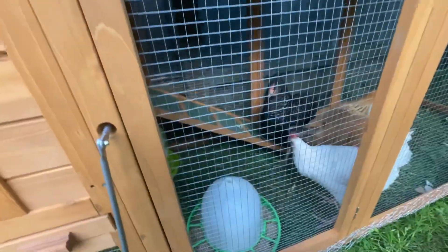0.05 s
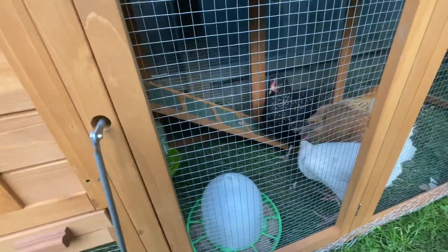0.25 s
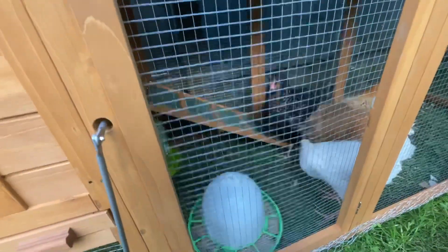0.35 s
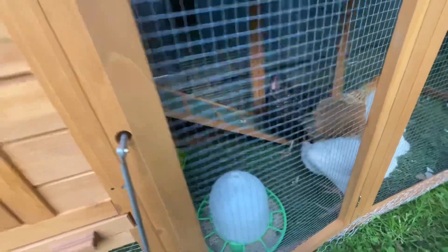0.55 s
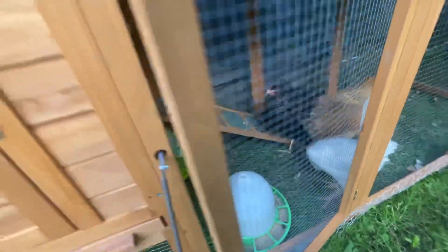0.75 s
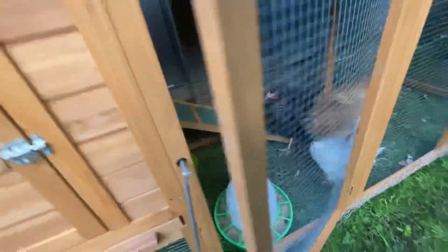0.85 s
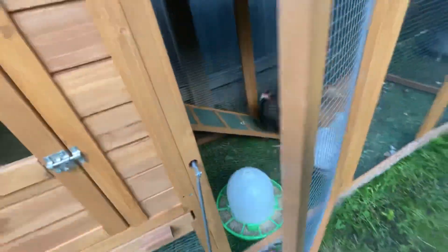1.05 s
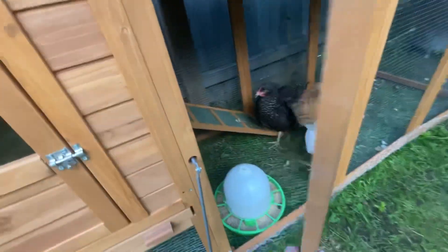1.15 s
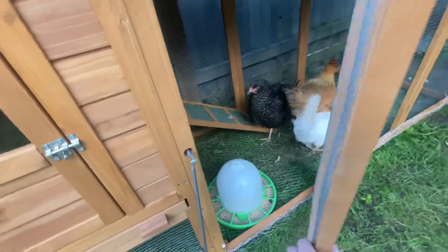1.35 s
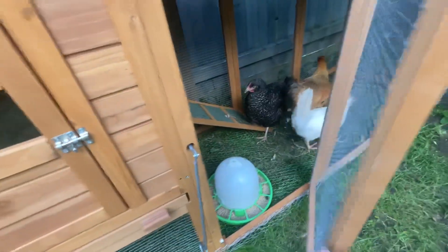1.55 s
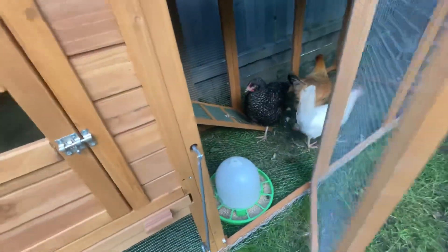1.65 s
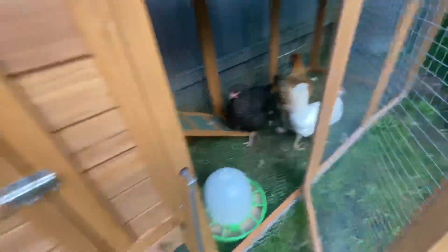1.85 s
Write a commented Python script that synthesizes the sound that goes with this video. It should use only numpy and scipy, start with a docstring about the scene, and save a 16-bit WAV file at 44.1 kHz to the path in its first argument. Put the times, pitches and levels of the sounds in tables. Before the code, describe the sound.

A metal latch on a light wooden door clicks, snaps sharply twice and rattles, then the door swings open with quiet creaking knocks and thin squeaks; close microphone in a quiet backyard, with low wind bumps.

```python
"""A metal latch is worked loose on a wooden coop door: struck modes of metal and wood, dense ticks, a bolt rasp.
The door swings open: its frame creaks in stick-slip knocks, small taps ring, and thin squeaks glide in pitch.
A short falling peep and a hen's short note, a harmonic tone, sound among them.
Filtered noise makes the gust on two microphone ports, the low rumble, the treble rustle and the yard air;
the yard returns sparse echoes. Mix levels are relative, ahead of the final soft overload."""
import sys
import numpy as np
from scipy import signal
from scipy.fft import rfft, irfft
from scipy.io import wavfile
from scipy.ndimage import uniform_filter1d

SR = 44100
rng = np.random.default_rng(int(sys.argv[2]) if len(sys.argv) > 2 else 0)


def to_wav(sig):
    """Store sig (one row per channel, or 1-D mono) as 16-bit WAV at the path in sys.argv[1].

    Samples outside -1..1 are clipped; the rate is SR.
    """
    pcm = np.clip(np.atleast_2d(sig), -1, 1) * 32767
    pcm = np.round(pcm).astype(np.int16)
    wavfile.write(sys.argv[1], SR, pcm.T)  # frames by channels


N = 83790
T = np.arange(N) / SR
STRIKE_T = np.arange(5000) / SR  # time within one struck sound [s]


def gain_of(db):
    """Decibel law: 20 dB is a factor of ten in amplitude."""
    return 10 ** (np.asarray(db) / 20)


def evened(x):
    """Normalization to unit root-mean-square."""
    return x / np.sqrt(np.mean(x ** 2) + 1e-20)


def read(points, hz):
    """Interpolation along a logarithmic frequency axis."""
    f, value = np.transpose(points)
    return np.interp(np.log(hz + 1), np.log(f + 1), value)


def column(rows, index, t=T):
    """Linear interpolation in time of one column of a table."""
    rows = np.array(rows)
    return np.interp(t, rows[:, 0], rows[:, index])


def coloured(x, points):
    """Spectral shaping: weights each frequency, then restores unit power."""
    n = x.shape[-1]
    weights = gain_of(read(points, np.fft.rfftfreq(n, 1 / SR)))
    return evened(irfft(rfft(x) * weights, n))


def add(mix, s, sound):
    """Superposition of a sound from time s [s], cut at the end of the mix."""
    part = mix[:, round(s * SR):][:, :sound.shape[1]]
    part += sound[:, :part.shape[1]]


def ring(modes, unlike_db, blur=0.012, count=3, spread_db=2.5):
    """Modal decay: clusters of close tones of chance strength, weighed a little differently by each port."""
    t = STRIKE_T
    hz, db, t60 = np.transpose(modes * count)[:, :, None]
    luck = rng.standard_normal((len(hz), 5))
    strength = gain_of(db + spread_db * luck[:, :1] - 60 * t / t60)
    detuned_hz = hz * (1 + blur * (1 + hz / 5000) * luck[:, 1:2])
    tones = strength * np.sin(2 * np.pi * (detuned_hz * t + 0.41 * luck[:, 2:3]))
    port_gains = gain_of(unlike_db * luck[:, 3:].T)
    out = port_gains @ tones * np.minimum(t / 0.00073, 1)
    return out / abs(out).max()


# spectrum of the bright crack: (frequency [Hz], level [dB per Hz])
CRACK_TONE = [(1060, -36), (1900, 5.5), (2300, 8.5), (3400, -1), (5530, -27.5), (8240, -21.5), (9870, -1),
              (12500, -15.5), (15700, -24)]


def crack(size):
    """Partial coherence: bright noise that is mostly alike at both ports."""
    a = rng.standard_normal((3, size))
    return coloured(a[0] + .45 * a[1:], CRACK_TONE)


# latch blows: (time [s], metal level [dB], wood re metal [dB], treble shift before a common +13.5 [dB])
LATCH_BLOWS = [(0.1072, -37.5, 10.5, -14.5), (0.1206, -43.5, -2, -12), (0.1356, -29.5, 7, -12),
               (0.1432, -24, -18, -13.5), (0.2423, -18.5, -2.5, -12), (0.2472, -10, 0, -15.5),
               (0.2514, -8, -6.5, -11), (0.2541, -14.5, 14, -14), (0.2561, -14.5, 10.5, -13),
               (0.4909, -31.5, -0.5, -24.5), (0.5275, -15, -8.5, -31.5), (0.5433, -27, -21, -31.5),
               (0.5494, -32.5, -17, -4), (0.5577, -26, -17.5, -24), (0.6054, -31.5, -12.5, -22.5),
               (0.6193, -25, -16.5, -17), (0.6264, -26, -9, -17.5), (0.6542, -3.5, -29, -14.5),
               (0.6562, -20.5, -3.5, -11.5), (0.6731, -30.5, -16, -23), (0.7172, -30, -9, -26.5),
               (0.7257, -23, -17, -55.5)]
# modes of the wooden door: (frequency [Hz], level [dB], T60 [s])
WOOD_MODES = [(324, -10, 0.03), (586, -11, 0.11), (662.4, -13, 0.17), (969, -0.5, .07), (1032, -4.5, 0.064),
              (1150, -4, 0.055), (1386, 19.5, 0.013), (1787, 1, 0.054), (2093, -5.5, 0.017)]
# modes of the metal latch: (frequency [Hz], level [dB], T60 [s])
METAL_MODES = [(2458, -18.5, 0.099), (3460, -8, 0.02), (4270, -4, 0.038), (4730, 1.5, 0.0082),
               (4980, -4, 0.013), (6150, 0.5, 0.016), (6687, -3.5, 0.023), (8165, -4.5, 0.028),
               (9320, -8.5, .018), (12460, -8.5, 0.025)]
# modes in the first instant of a blow: (frequency [Hz], level [dB], T60 [s])
TICK_MODES = [(3555, 11, 0.002), (5100, -8, 0.0017), (6270, -6, 0.0017), (8570, -2, 0.0037)]
TICK_DB = 3
CRACK_DB, CRACK_T60_S = 2, 0.0075  # the crack is then halved
TREBLE_HZ = 7820  # midpoint of the treble shelf


def latch():
    """Impact excitation: each blow is a tick, a crack, the ring of the latch and the ring of the door."""
    out, t = np.zeros((2, N)), STRIKE_T
    high = 1 / (1 + (TREBLE_HZ / (np.fft.rfftfreq(len(t), 1 / SR) + 1)) ** 8)
    for s, db, wood_db, treble_db in LATCH_BLOWS:
        crack_envelope = gain_of(CRACK_DB - 60 * t / CRACK_T60_S) * np.minimum(t / 0.00021, 1)
        snap = crack_envelope * crack(len(t)) / 2
        tick = gain_of(TICK_DB) * ring(TICK_MODES, 1.1, blur=.02, count=1)
        struck = ring(METAL_MODES, 1.2) + tick + snap
        metal = irfft(rfft(struck) * gain_of(high * (treble_db + 13.5)), len(t))
        wood = ring(WOOD_MODES, 2.5)
        add(out, s, gain_of(db) * metal + gain_of(db + wood_db) * wood)
    return out


TICK_SIZE_DB = 4  # scale of the chance tick size


def tick_train(per_s):
    """Poisson-like excitation: ticks of uneven size at chance moments."""
    sizes = gain_of(TICK_SIZE_DB * np.minimum(rng.exponential(1, N), 4))
    return sizes * (rng.random(N) < per_s / SR)


def rung_by(ticks, modes, unlike_db):
    """Convolution: every tick starts the same short modal ring."""
    return signal.oaconvolve(ticks[None], ring(modes, unlike_db)[:, :2000], axes=1)[:, :N]


# rattle and rub of latch and mesh: (time [s], wood level [dB], metal level [dB])
RATTLE_LEVEL = [(0, -96, -69.5), (.09, -74.5, -68), (.115, -49, -66.5), (.15, -40, -27), (.19, -70, -85.5),
                (.228, -52.5, -57), (.25, -33, -16.5), (.285, -50.5, -33.5), (.37, -43, -53),
                (.48, -49, -61), (.495, -50, -44), (.518, -65.5, -73), (.532, -43.5, -31), (.6, -42.5, -40),
                (.63, -41.5, -36.5), (.648, -45.5, -39.5), (.67, -41.5, -37.5), (.74, -48, -54.5),
                (.8, -62, -76.5), (.9, -58, -82)]
RATTLE_PER_S, RATTLE_HISS_DB = 1000, -4  # ticks per second; hiss re metal ticks
SOFT_DB = 9.5  # light ticks stir the upper wood modes less [dB per octave]


def rattle():
    """Repeated impact: dense small ticks ring wood and metal, with a bright hiss in the metal."""
    out = np.zeros((2, N))
    soft_wood = [(hz, db - SOFT_DB * np.log2(hz / 1000), t60) for hz, db, t60 in WOOD_MODES]
    fade = np.clip((.95 - T) / 0.11, 0, 1)
    for index, modes in ((1, soft_wood), (2, METAL_MODES)):
        sound = np.zeros((2, N))
        for _ in range(8):  # eight differing rings share the ticks
            sound += rung_by(tick_train(RATTLE_PER_S / 8), modes, 1.7)
        if modes is METAL_MODES:
            sound = evened(sound) + gain_of(RATTLE_HISS_DB) * crack(N)
        out += evened(sound) * gain_of(column(RATTLE_LEVEL, index)) * fade
    return out


# passage of the bolt through its keeper: start [s], end [s], level [dB]
BOLT_RASP = .53, 0.75, -42.5
# modes of the rasping bolt: (frequency [Hz], level [dB], T60 [s])
BOLT_MODES = [(2580, 8, 0.038), (3080, -4, .02), (5300, 0, 0.015), (6780, -8, .03)]


def rasp():
    """Frictional excitation: ticks of random sign ring the bolt as it slides."""
    start, end, db = BOLT_RASP
    ticks = tick_train(RATTLE_PER_S / 2) * rng.choice([-1, 1], N)
    edge = np.clip(np.minimum(T - start, end - T) / 0.0083, 0, 1)
    return evened(rung_by(ticks, BOLT_MODES, 1.4)) * gain_of(db) * edge


# creak slips: (time [s], peak level [dB])
CREAK_SLIPS = [(1.115, -47), (1.43, -35), (1.61, -41), (1.619, -44.5), (1.64, -40.5), (1.667, -40.5),
               (1.697, -38), (1.727, -38), (1.777, -40), (1.803, -30.5), (1.8751, -32.5), (1.8975, -32.5)]
# modes of the frame under a slip: (frequency [Hz], level [dB], T60 [s])
FRAME_MODES = [(625, -12.5, 0.041), (967, 0, 0.014), (1180, -4, 0.013), (2436, -4.5, 0.0097),
               (3960, -3.5, 0.0034)]


def creak():
    """Stick-slip: each slip knocks the modes of the frame once."""
    out = np.zeros((2, N))
    for s, db in CREAK_SLIPS:
        add(out, s, gain_of(db) * ring(FRAME_MODES, 0.84, count=1, spread_db=1))
    return out


# small single taps: (time [s], peak level [dB], frequency [Hz])
SMALL_TAPS = [(0.051, -36, 317), (0.2, -33.5, 341.6), (1.114, -40.5, 508), (1.3671, -40.5, 1407),
              (1.844, -42, 1550)]


def taps():
    """Free vibration: each tap is one short ring of two modes."""
    out = np.zeros((2, N))
    for s, db, hz in SMALL_TAPS:
        modes = [(hz, 0, .03), (1.62 * hz, -10, .015)]
        add(out, s, gain_of(db) * ring(modes, 0.37, blur=.01, count=1))
    return out


def gliding(phrases, tones, rough):
    """Frequency modulation: gliding tones with an unsteady pitch and a wavering strength."""
    out = np.zeros(N)
    waver = gain_of(2.2 * evened(uniform_filter1d(rng.standard_normal(N), 300)))
    wobble = evened(uniform_filter1d(rng.standard_normal(N), 120))
    for rows in phrases:
        edge = np.clip(np.minimum(T - rows[0][0], rows[-1][0] - T) / 0.006, 0, 1)
        phase = 2 * np.pi * np.cumsum(column(rows, 1) * (1 + rough * wobble)) / SR
        voice = sum(gain_of(db) * np.sin(k * phase) for k, db in tones)
        out += edge * gain_of(column(rows, 2)) * np.sqrt(2) * voice
    return waver * out * gain_of([[.8], [-.8]])  # left a little stronger


# squeak phrases, each a list of: (time [s], frequency [Hz], level [dB])
SQUEAK_PHRASES = [
    [(1.13, 8520, -74.5), (1.196, 8800, -71.5), (1.26, 9650, -80)],
    [(1.31, 6950, -77.5), (1.346, 7540, -75), (1.384, 7070, -72.5), (1.402, 7350, -72.5),
     (1.421, 8500, -59.5), (1.434, 8540, -60), (1.452, 6800, -77)],
    [(1.51, 8130, -68), (1.552, 9200, -72), (1.578, 9304, -75), (1.595, 8900, -75), (1.625, 7750, -86)],
    [(1.66, 5880, -84.5), (1.692, 6500, -76), (1.722, 7900, -75), (1.742, 8550, -59.5),
     (1.768, 8800, -65.5), (1.788, 9330, -71), (1.818, 8380, -63), (1.828, 7600, -77)],
    [(1.84, 8716, -70), (1.88, 8700, -65)],
]
# a short falling peep: (time [s], frequency [Hz], level [dB])
PEEP = [(1.133, 1700, -78), (1.143, 1597, -52), (1.158, 1200, -59.5)]


def squeak():
    """Pure-tone glide: thin single partials wander, and one short peep falls."""
    return gliding(SQUEAK_PHRASES + [PEEP], [(1, 0)], rough=.006)


# a hen's short note: (time [s], pitch [Hz], level before the partials are weighed [dB])
HEN_NOTE = [(1.388, 969, -61.5), (1.408, 943, -64.5), (1.44, 949, -68), (1.48, 904, -71.5)]
# partials of the note: (multiple of the pitch [1], level [dB])
HEN_PARTIALS = [(1, 2), (2, 5.5), (3, -8.5)]


def hen():
    """Harmonic series: three partials share one rough pitch."""
    return gliding([HEN_NOTE], HEN_PARTIALS, rough=.06)


# gust on the microphone: (time [s], low level [dB], upper level [dB])
GUST_LEVEL = [(0.34, -65, -83), (0.396, -42, -53.5), (0.49, -40, -36.5), (0.516, -36, -44.5),
              (0.558, -35, -40), (0.594, -57.5, -55), (0.626, -27.5, -38), (0.644, -39.5, -61),
              (0.704, -59, -107), (0.79, -72.5, -75), (0.828, -49, -55), (0.848, -61, -60),
              (0.882, -82, -81), (0.95, -75, -78)]
GUST_RIGHT, GUST_LUMP_DB = -0.55, 1.2  # right port re left [factor]; depth of the lumps


def gust():
    """Opposed pressure: lumpy low noise pushes one port and pulls the other."""
    mid = GUST_RIGHT / 2 + .5  # the part left when both ports are averaged
    low_tone = [(20, -33.0), (65, -7), (110, -9.5), (160, -37.5), (20000, -120)]  # (Hz, dB)
    upper_tone = [(70, -49), (130, 9.5), (300, 1.5), (600, -18.5), (1500, -44.0), (20000, -120)]
    fade = np.clip((T - .3) / .05, 0, 1) * np.clip((1 - T) / 0.18, 0, 1)
    out = np.zeros((2, N))
    for index, tone in ((1, low_tone), (2, upper_tone)):
        lumps = gain_of(GUST_LUMP_DB * evened(uniform_filter1d(rng.standard_normal(N), 700)))
        a = coloured(rng.standard_normal((2, N)), tone)
        push = np.array([a[0], GUST_RIGHT * a[0] + 0.085 * a[1]]) * evened(lumps) / mid
        out += push * gain_of(column(GUST_LEVEL, index)) * fade
    return out


# low rumble: (time [s], level [dB])
RUMBLE_LEVEL = [(0, -73), (.088, -44.5), (.155, -56), (.2, -43.5), (.27, -47.5), (.36, -47.5), (.6, -54.5),
                (.85, -61.5), (.93, -84), (1.04, -80), (1.15, -67.5), (1.45, -67), (1.9, -71)]


def rumble():
    """Coherent sound field: low noise that both ports largely share."""
    tone = [(20, -39.5), (45, -12), (65, 2), (85, -25.5), (130, -49), (20000, -120)]  # (Hz, dB)
    a = coloured(rng.standard_normal((3, N)), tone)
    return (a[0] + 0.13 * a[1:]) * gain_of(column(RUMBLE_LEVEL, 1))


# left-right likeness of diffuse noise: (frequency [Hz], correlation [1])
LIKENESS = [(60, 1), (240, -0.49), (950, -0.29), (15000, 0.12)]


def wash(tone, patchy_db, flicker_db):
    """Diffuse field: random short-time spectra with drifting patches and a flicker shared by all bands."""
    frames, hz = N // 128 + 5, np.fft.rfftfreq(512, 1 / SR)
    a, b, c, d, patches = rng.standard_normal((frames, 257, 5)).T
    patches = evened(uniform_filter1d(uniform_filter1d(patches, 8, 0), 16, 1))
    flicker = evened(uniform_filter1d(rng.standard_normal(frames), 5))
    same = np.clip(read(LIKENESS, hz), -1, 1)[:, None]
    left = a + 1j * b
    right = same * left + np.sqrt(1 - same ** 2) * (c + 1j * d)
    z = np.array([left, right]) * gain_of(patchy_db * patches + flicker_db * flicker)
    return coloured(signal.istft(z, nperseg=512, noverlap=384)[1][:, :N], tone)


# treble rustle: (time [s], level before RUSTLE_DB is added [dB])
RUSTLE_LEVEL = [(0.768, -98), (0.788, -61.5), (0.934, -73), (1.008, -58), (1.044, -68.5), (1.304, -65),
                (1.416, -68), (1.472, -57), (1.64, -64), (1.652, -75.5), (1.812, -67.5), (1.838, -55.5),
                (1.87, -66.5), (1.9, -53)]
# spectrum of the rustle: (frequency [Hz], level [dB per Hz])
RUSTLE_SPECTRUM = [(1180, -21), (2000, -3.5), (2610, -2), (4230, -8.5), (6230, -6), (9670, -11.5),
                   (12700, -11.5), (15700, -24.5)]
RUSTLE_DB = 4


def rustle():
    """Amplitude modulation: patchy, flickering noise follows a level curve."""
    noise = wash(RUSTLE_SPECTRUM, patchy_db=5.0, flicker_db=2.0)
    return noise * gain_of(column(RUSTLE_LEVEL, 1) + RUSTLE_DB)


# spectrum of the yard air: (frequency [Hz], level [dB per Hz])
AIR_SPECTRUM = [(53, -40), (90, -5.5), (168, 0.5), (295, 1), (485, -4), (601, -8.5), (831, -8),
                (1230, -8.5), (2010, -11.5), (2550, -24.5), (6900, -29), (15700, -38)]
# yard air: (time [s], level [dB])
AIR_CURVE = [(0.0, -55), (0.142, -48.5), (0.284, -41), (0.454, -58.5), (0.544, -38), (0.698, -53),
             (1.29, -53), (1.422, -58.5), (1.672, -62.5), (1.83, -57.5), (1.9, -59.5)]


def air():
    """Background noise: a patchy diffuse field of slowly varying level."""
    return gain_of(column(AIR_CURVE, 1)) * wash(AIR_SPECTRUM, patchy_db=3.5, flicker_db=0.0)


# reverberation of the yard: (frequency [Hz], T60 [s])
YARD_DECAY = [(500, 0.89), (1500, .35), (5000, .3), (12000, 0.028)]
YARD_DB = -12


def yard(x):
    """Reverberation: sparse reflections of random sign, each band dying at its own speed."""
    echoes = np.zeros((2, SR // 2))
    at = np.arange(200, SR // 2 - 20, 20)
    places = at + rng.integers(0, 20, (2, len(at)))
    np.put_along_axis(echoes, places, rng.choice([-1., 1.], (2, len(at))), 1)
    echoes[1] = 0.22 * echoes[0] + 0.84 * echoes[1]
    hz, t, z = signal.stft(echoes, SR, nperseg=256)
    decay = gain_of(-60 * t / read(YARD_DECAY, hz)[:, None])
    tail = signal.istft(z * decay, SR, nperseg=256)[1]
    return signal.fftconvolve(x.mean(0)[None], tail / np.linalg.norm(tail[0]), axes=1)[:, :N]


def ported(x, phase, pan_db):
    """Interchannel difference: the two ports hear a near source with different phase and strength."""
    side = np.array([[.5], [-.5]])
    turn = np.exp(1j * side * read(phase, np.fft.rfftfreq(N, 1 / SR)))
    return gain_of(side * pan_db) * irfft(rfft(x) * turn, N)


# phase of latch sounds: (frequency [Hz], lead of the left port [rad])
LATCH_LEAD = [(0, 2.5), (260, 5.5), (1290, -0.88), (3190, 13), (4650, 14), (6120, 10), (7320, 14.5),
              (9220, 4.0), (12400, 0.8), (15400, -17.2)]
# phase of frame sounds: (frequency [Hz], lead of the left port [rad])
FRAME_LEAD = [(600, -1.64), (1000, -1.24), (2400, -1.1), (5000, 0)]


def scene():
    """Linear superposition: door sounds and their echoes over voices, wind and air."""
    blows, knocks = latch(), creak() + taps()
    latch_sounds = blows + rattle() + rasp()
    door = ported(latch_sounds, LATCH_LEAD, pan_db=1) + ported(knocks, FRAME_LEAD, pan_db=0.54)
    echoes = gain_of(YARD_DB) * yard(blows + knocks)
    return door + echoes + squeak() + hen() + gust() + rumble() + rustle() + air()


EDGE_HZ = 15800  # upper band limit


def record(dry):
    """Saturation and band limiting: strong peaks are rounded softly, then a low-pass filter follows."""
    rounded = 1.242 * np.tanh(dry / 1.431)
    low_pass = signal.firwin(511, EDGE_HZ, window=("kaiser", 9), fs=SR)
    return signal.oaconvolve(rounded, low_pass[None], "same")


dry = scene()
out = record(dry)
to_wav(out)
```